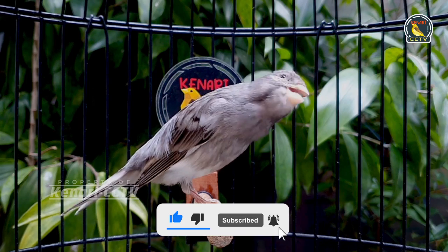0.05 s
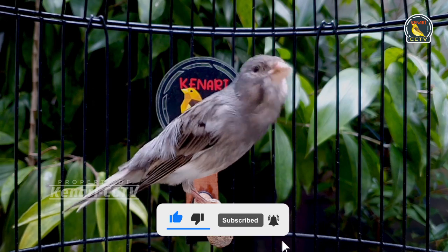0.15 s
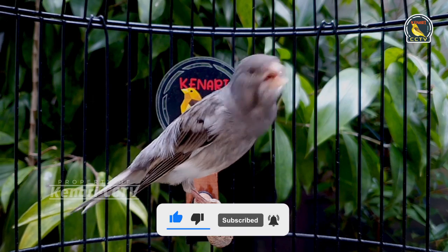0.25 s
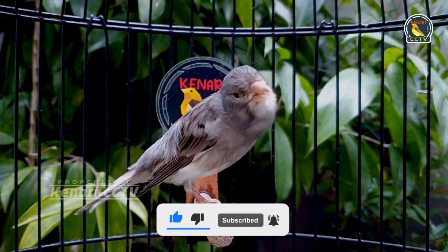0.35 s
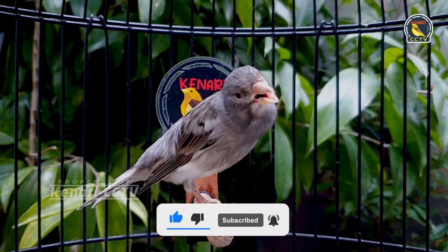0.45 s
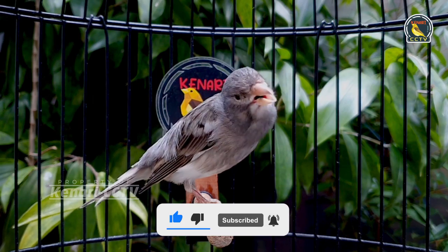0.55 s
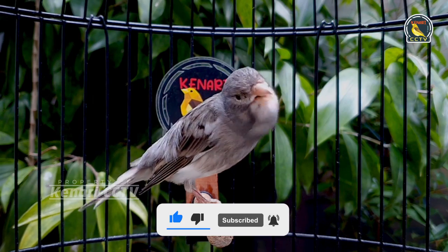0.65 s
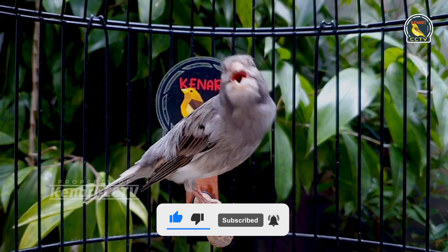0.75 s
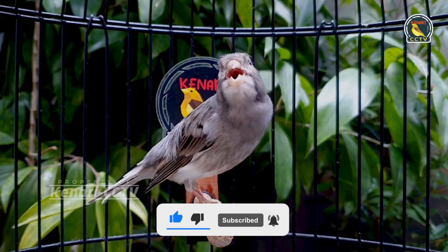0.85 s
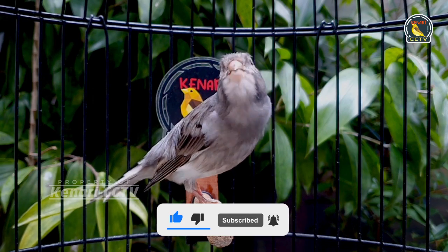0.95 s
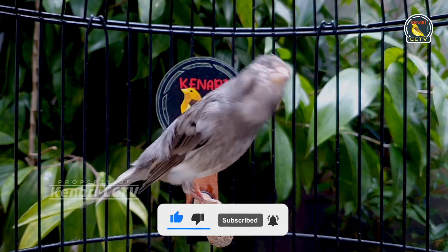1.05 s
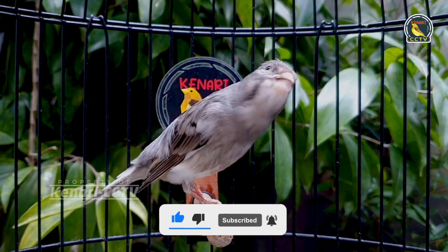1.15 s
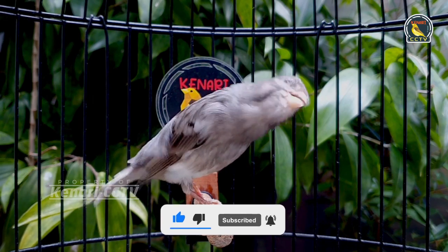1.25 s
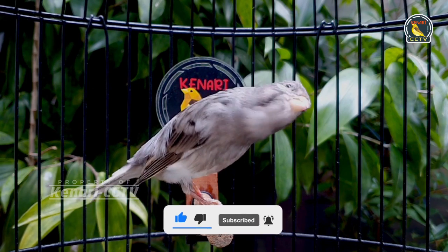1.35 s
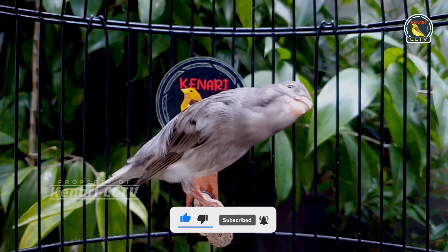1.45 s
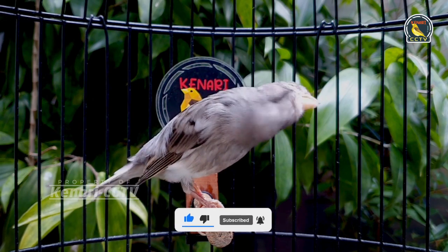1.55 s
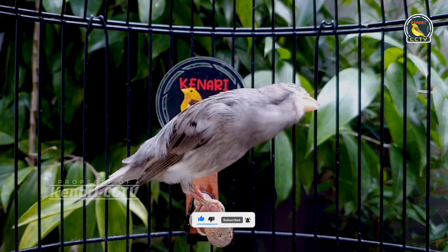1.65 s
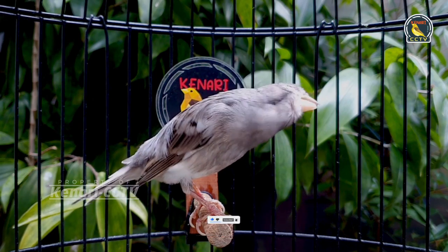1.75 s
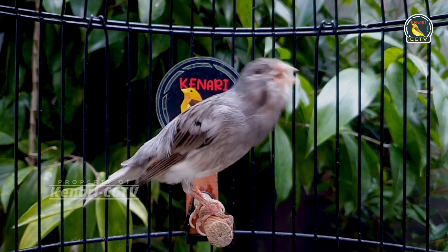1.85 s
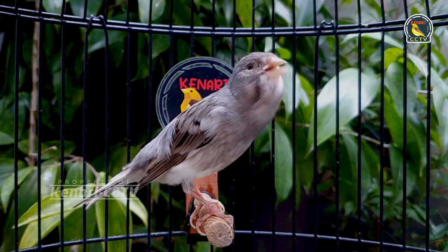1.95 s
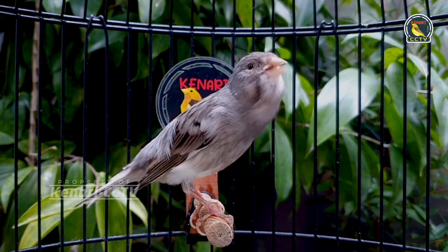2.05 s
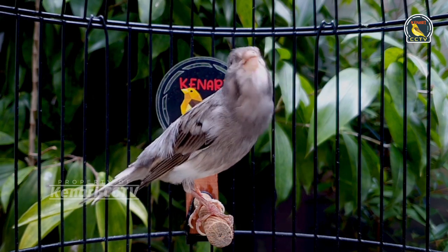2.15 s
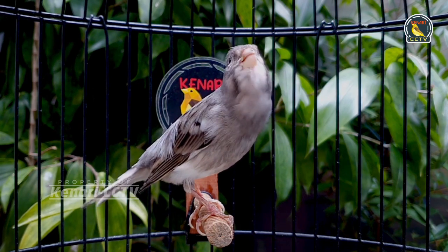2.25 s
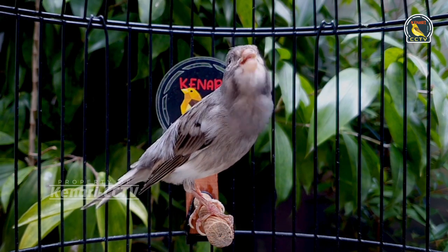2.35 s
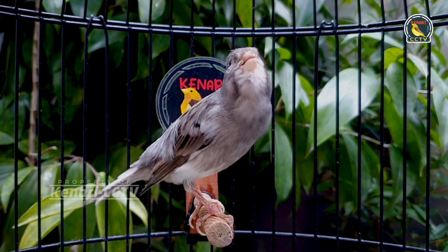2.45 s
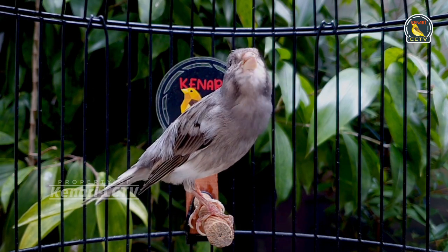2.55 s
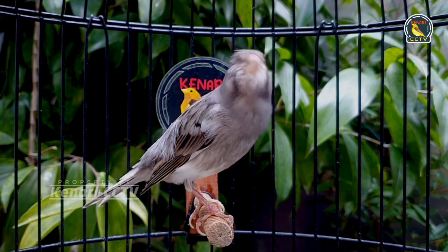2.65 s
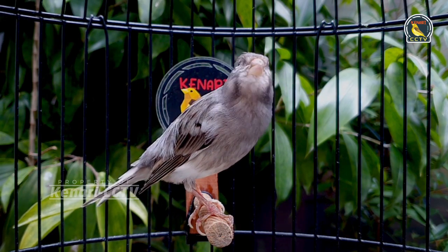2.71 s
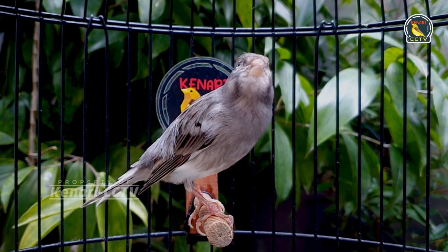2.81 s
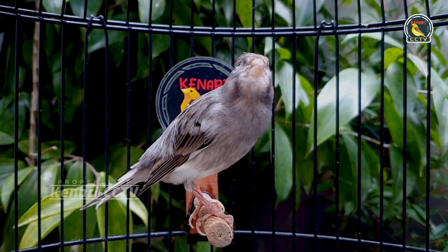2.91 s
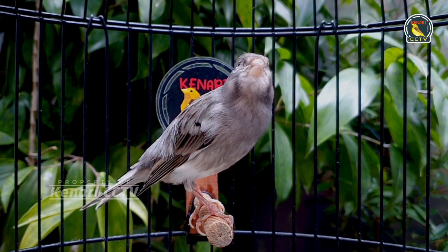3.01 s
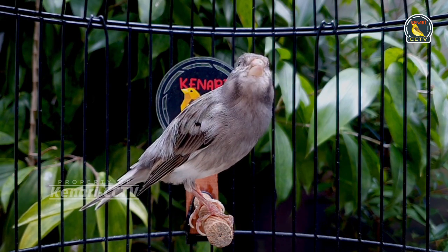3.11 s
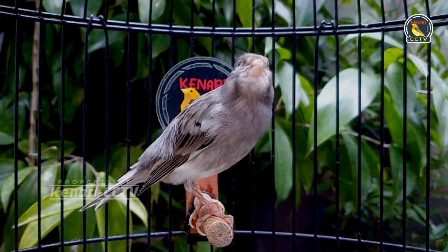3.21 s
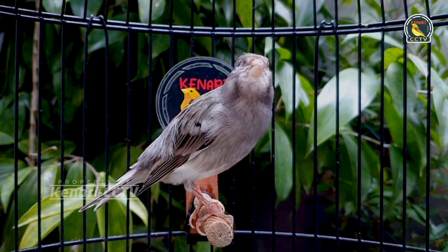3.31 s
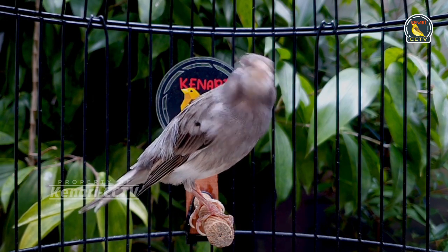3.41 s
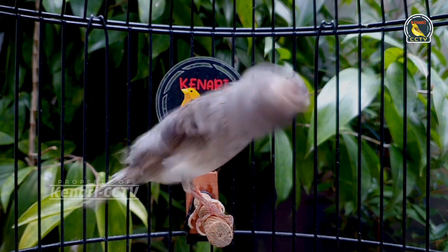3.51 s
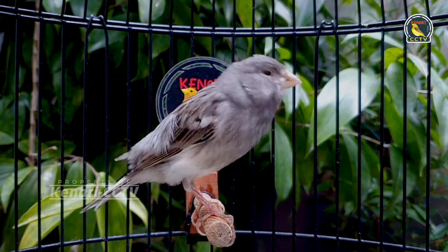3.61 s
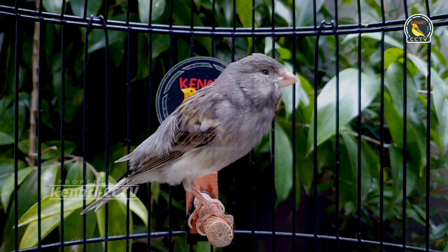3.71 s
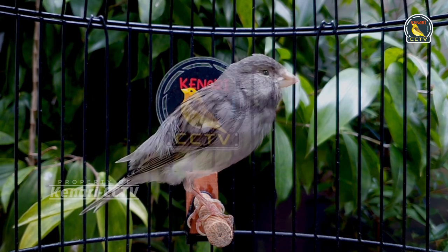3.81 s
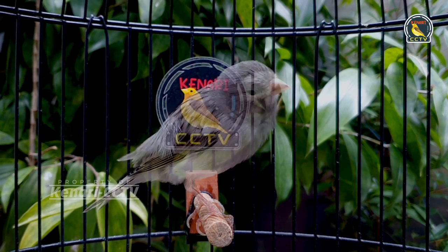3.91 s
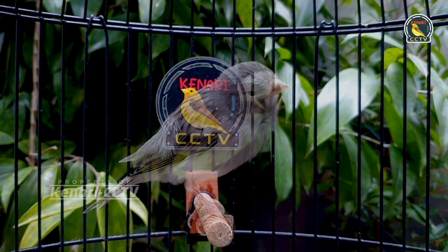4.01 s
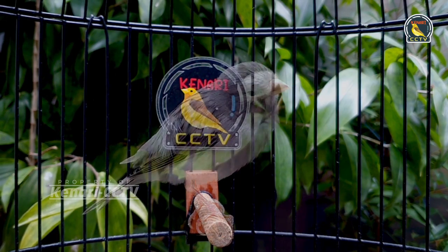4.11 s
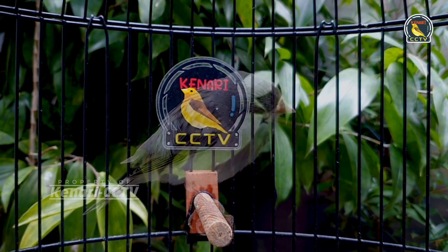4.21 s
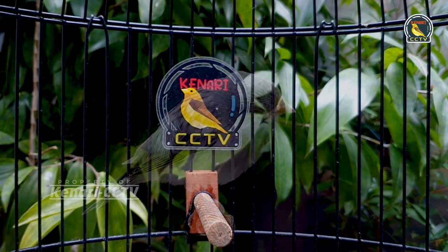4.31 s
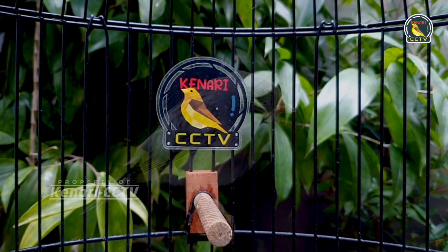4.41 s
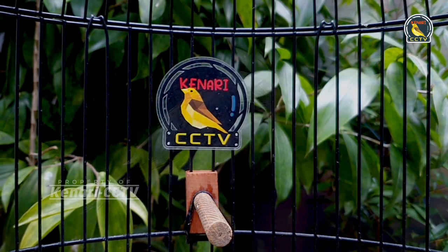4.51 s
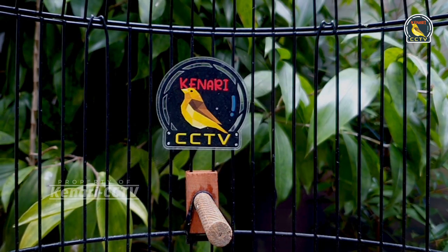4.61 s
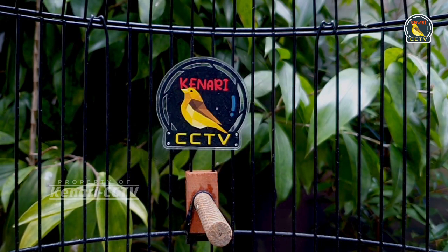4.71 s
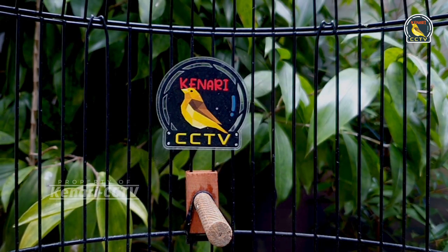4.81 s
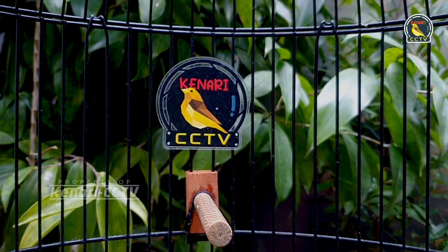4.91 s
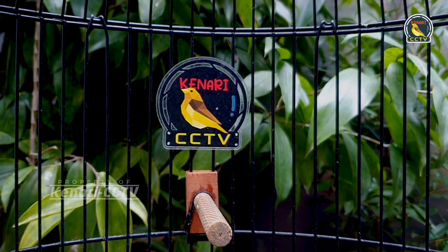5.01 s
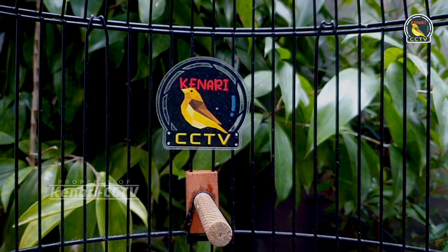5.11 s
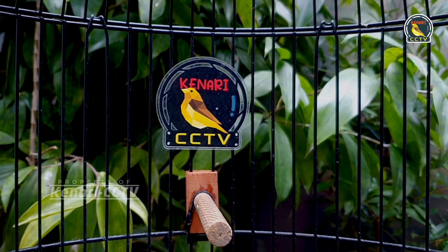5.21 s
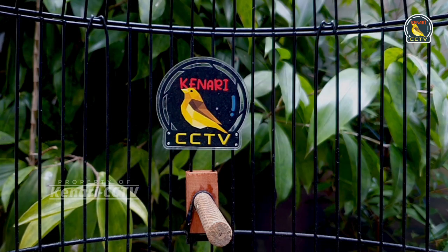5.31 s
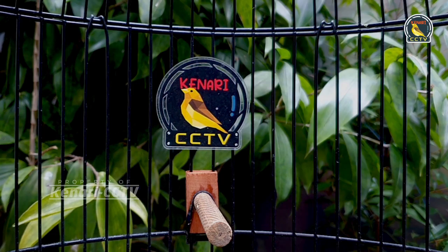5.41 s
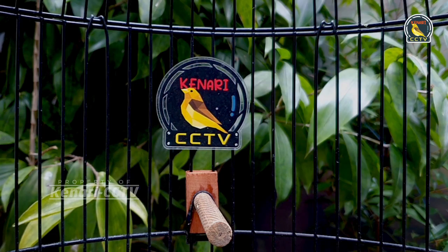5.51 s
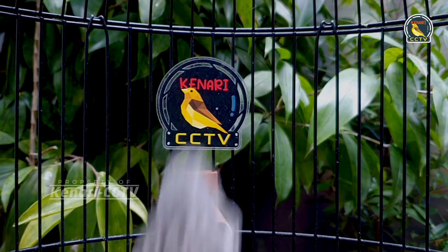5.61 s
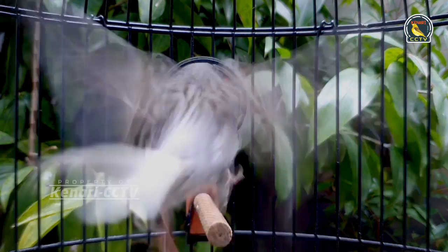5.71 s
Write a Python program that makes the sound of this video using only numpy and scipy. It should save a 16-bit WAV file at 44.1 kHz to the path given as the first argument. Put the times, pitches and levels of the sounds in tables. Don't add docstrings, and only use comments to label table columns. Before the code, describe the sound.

Close birdsong of sliding whistles and quick trills stops; wood creaks and knocks, then a rough chirp and fluttering wings end it.

```python
import sys
import numpy as np
from scipy import signal
from scipy.fft import rfft, irfft
from scipy.io import wavfile
from scipy.ndimage import uniform_filter1d

SR = 44100
rng = np.random.default_rng(int(sys.argv[2]) if len(sys.argv) > 2 else 0)


def dump(signal):
    limited = np.clip(np.atleast_2d(signal).T, -1, 1)
    pcm = np.round(limited * 32767).astype(np.int16)
    wavfile.write(sys.argv[1], SR, pcm)


def undo_db(level):
    steps = np.asarray(level, float) / 20
    return 10 ** steps


N = 254016
TIME = np.arange(N) / SR
RUN_IN = int(.2 * SR)


def rms_one(x):
    return x / np.sqrt(np.mean(x ** 2) + 1e-20)


def in_time(rows):
    s, *columns = np.transpose(rows)
    return [np.interp(TIME, s, c) for c in columns]


def pan(x, db):
    return x * undo_db(np.array([db / 2, -db / 2]))


def band_pass(x, order, low_hz, high_hz):
    return signal.sosfilt(signal.butter(order, [low_hz, high_hz], "band", fs=SR, output="sos"), x)


def resonate(x, peaks):
    out = 0
    for k, (hz, width, db) in enumerate(peaks):
        r = np.exp(-np.pi * width / SR)
        band = signal.lfilter([1, 0, -1], [1, -2 * r * np.cos(2 * np.pi * hz / SR), r * r], x)
        out = out + (-1) ** k * undo_db(db) * (1 - r * r) / 2 * band
    return out


def coloured(spectrum):
    hz, db = np.transpose(spectrum)
    log_hz = np.log(np.fft.rfftfreq(N, 1 / SR) + 1)
    shape = undo_db(np.interp(log_hz, np.log(hz), db, -120, -120))
    return rms_one(irfft(rfft(rng.standard_normal((2, N))) * shape, N))


def wobble(rate_hz):
    slow = signal.butter(2, rate_hz, fs=SR, output="sos")
    return rms_one(signal.sosfilt(slow, rng.standard_normal(N)))


def sing(out, s, hz, partial_dbs, pan_db, plain_count=1, flutter=None, first=1):
    # (frequency [Hz], level [dB])
    beak = [(2500, 11), (4000, -8), (5500, -6), (6800, -19.5), (7900, -4), (10500, 6), (13000, -6),
            (16000, -9)]
    left_lead_s = .00006
    i = np.arange(int(s[0] * SR), int(s[-1] * SR))
    t = i / SR
    pitch = uniform_filter1d(np.interp(t, s, hz), size=60)
    if flutter is not None:
        pitch = pitch * (1 + flutter[2, i])
    turns = np.cumsum(pitch) / SR + pitch * left_lead_s * np.array([[.5], [-.5]])
    to_edge = np.minimum(t - s[0], s[-1] - t)
    edge = np.sin(np.pi / 2 * np.clip(to_edge / .002, 0, 1)) ** 2
    for k, db in enumerate(partial_dbs, start=first):
        db = uniform_filter1d(np.interp(t, s, db), size=70)
        db = db + (k > plain_count) * np.interp(k * pitch, *np.transpose(beak))
        size = np.sqrt(2) * undo_db(db) * edge * np.clip((16500 - k * pitch) / 500, 0, 1)
        if flutter is not None:
            size = size * undo_db(flutter[k % 2, i] * (1.5 + (k > plain_count)))
        wave = np.sin(2 * np.pi * (k * turns + rng.random()))
        out[:, i + RUN_IN] += pan(size * wave, np.interp(t, s, pan_db))


def with_overtones(db, overtones_db, follow):
    chance_db = 2.5 * rng.standard_normal(len(overtones_db))
    return [db] + [follow * (db + 10.0) + over for over in overtones_db + chance_db]


def whistles():
    # (share of the length [0-1], pitch [Hz], level re the note [dB], left-right [dB])
    quick_fall = [(0, 6334, -32, -1), (.05, 7570, -11, 11), (.12, 7450, -19, 8.5), (.22, 6448, -17, -2),
                  (.33, 5750, 1.5, 0), (.5, 4765, -4, 1.5), (.7, 3810, 2.5, -3), (.86, 2945, -1.5, -0.5),
                  (.94, 2268, -10, -2.5), (1, 1247, -38.5, -1)]
    slow_fall = [(0, 7240, -43.5, -4), (.035, 7680, -16, 17.5), (.17, 7600, -16.5, 13.5),
                 (.4, 6596, -29, 1.5), (.7, 5724, -14.5, -1), (.865, 5110, -4.54, 2), (.925, 4886, -1.5, 4),
                 (.955, 4767, 1.5, -6.5), (1, 4446, -3, 10.5)]
    swelling_fall = [(0, 7300, -35.5, -1.5), (.035, 7680, -19.5, 21.5), (.16, 7620, -18.5, 20.5),
                     (.45, 6550, -21.5, 3), (.72, 5400, -1, 3), (.78, 5360, -17, 5.5),
                     (.86, 5150, -8.5, 2.5), (.94, 4763, -0.5, -1), (1, 4450, -16.5, 1)]
    flick = [(0, 4400, -23, -9), (.4, 3730, 2.5, -0.5), (1, 2390, -33.5, -5.5)]
    hook = [(0, 3900, -21, 0), (.3, 4700, -26.5, 1), (.5, 5580, -17, 3.5), (.62, 5820, -3, 2),
            (.77, 6330, -3.5, -6.5), (1, 6400, -9.5, 13)]
    pickup = [(0, 974, -21.5, 3), (.4, 1400, -11, -1), (.8, 1800, 3, 0), (1, 2052, -3, 0.5)]
    # (time [s], length [s], level [dB])
    quick_falls = [
        (-.114, .15, -13),
        (0.095, 0.15, -14.5),
        (0.295, .15, -16),
    ]
    slow_falls = [
        (0.486, .212, -15),
    ]
    swelling_falls = [
        (0.768, .214, -13),
    ]
    flicks = [
        (0.711, .0085, -12.5),
        (0.991, 0.006, -12),
    ]
    hooks = [
        (2.408, 0.045, -26.5),
    ]
    pickups = [
        (1.564, 0.0084, -39),
    ]
    # (time [s], pitch [Hz], level [dB], left-right [dB])
    held = [(2.449, 3164, -42, 5.5), (2.463, 3140, -24.5, 6), (2.477, 3120, -13.5, -8),
            (2.493, 3143, -18, -1), (2.504, 3095, -16.5, -4.5), (2.529, 3103, -19, -1),
            (2.56, 3092, -16.5, -1.5), (2.59, 3089, -28, 12.5), (2.616, 3024, -51, 2)]
    overtones_db = [-43, -39, -54.5, -55]
    held_overtones_db = [-45, -51.5, -62, -62.5]
    follow, soft_follow = .12, .9
    bar_echo_s, bar_echo_db = .00059, -11

    out = np.zeros((2, N + RUN_IN))
    waver = np.array([1.1 * wobble(rate_hz=60), 1.1 * wobble(rate_hz=80), .003 * wobble(rate_hz=44)])
    kinds = ((quick_fall, quick_falls, follow), (slow_fall, slow_falls, follow),
             (swelling_fall, swelling_falls, follow), (flick, flicks, follow),
             (hook, hooks, soft_follow), (pickup, pickups, soft_follow))
    for shape, notes, share_followed in kinds:
        share, hz, db, pan_db = np.transpose(shape)
        for s, length, note_db in notes:
            partials = with_overtones(db + note_db, overtones_db, share_followed)
            sing(out, s + share * length, hz, partials, pan_db, flutter=waver)
    out = out + undo_db(bar_echo_db) * np.roll(out, round(bar_echo_s * SR), axis=1)
    s, hz, db, pan_db = np.transpose(held)
    held_partials = with_overtones(db + 11, held_overtones_db, .9)
    sing(out, s, hz, held_partials[1:], pan_db, first=2)
    sing(out, s, hz, [db], pan_db, flutter=.5 * waver)
    return out


def rumble():
    # (time [s], thrum level [dB], housing ring re thrum [dB], left-right [dB])
    shaking = [(0, -55.5, -20.5, -11), (.72, -62.5, -17.5, -8), (1.12, -54.5, -20, -7),
               (1.65, -62.5, -15.5, -14), (2.15, -55, -20.5, -14.5), (2.65, -60, -16.5, -11),
               (2.95, -71, -12, -7.5), (3.55, -70, -17, -4.5), (3.65, -50, -18, -18),
               (3.88, -58.5, -10.5, -16), (4.03, -50, -5, -19), (4.45, -55, -5.5, -15.5),
               (4.58, -64, -3, -16), (5.1, -57, -9, -4.5), (5.47, -63, -3.5, -11.5), (5.56, -34.5, -9, -12),
               (5.64, -34, -12.5, -17), (5.76, -29, -14.5, -2)]
    # (frequency [Hz], width [Hz], level [dB])
    thrum_modes = [(50, 15, 3.5), (85.96, 39, 4), (127.3, 5.8, -7.5)]
    housing_modes = [(200, 37, -2.5), (273, 30.5, 4.5), (435, 60, -4.5), (557.5, 430, -16.5)]
    sway_db = 4
    thrum_db, ring_db, pan_db = in_time(shaking)
    thrum_pan = pan_db + sway_db * wobble(rate_hz=7.9)
    housing_pan = pan_db + sway_db * wobble(rate_hz=11.0)
    white = rng.standard_normal((2, 2, N))
    thrum = band_pass(resonate(white[0], thrum_modes), 2, 35, 145)
    housing = band_pass(resonate(white[1], housing_modes), 2, 150, 750)
    thrum = rms_one(thrum) * undo_db(thrum_db + 1.2 * wobble(rate_hz=16))
    housing = rms_one(housing) * undo_db(thrum_db + ring_db + 1.6 * wobble(rate_hz=50))
    return pan(thrum, thrum_pan) + pan(housing, housing_pan)


def hiss():
    # (frequency [Hz], level per Hz [dB])
    hiss_colour = [(410, -30.5), (700, -12.5), (1060, -17.5), (1180, -18.5), (3030, -20), (5020, -20),
                   (6420, -26.5), (11200, -23.5), (15500, -48.5)]
    shaken = np.clip((TIME - 3.55) / 0.14, 0, 1)
    return undo_db(-84 + 4 * shaken) * coloured(hiss_colour)


def trill(notes, lead, body, lead_db, lead_follow, wait_s, overtones_db, follow, pan_db):
    out, lead, body = np.zeros((2, N + RUN_IN)), np.array(lead), np.array(body)
    for s, end, top_hz, loud_db, falter_db in notes:
        soft_db = lead_db + lead_follow * (loud_db + 15.5)
        times = s + np.r_[lead[:, 0], wait_s + body[:, 0] * (end - wait_s)]
        climb_hz = lead[-1, 1] + body[:, 1] * (top_hz - lead[-1, 1])
        hz = np.r_[lead[:, 1], climb_hz]
        db = np.r_[soft_db + lead[:, 2], loud_db + body[:, 2] + falter_db * body[:, 3]]
        sing(out, times, hz, with_overtones(db, overtones_db, follow), pan_db + 0 * times)
    return out


def slow_trill():
    # (time at 3 kHz [s], time from there to the end [s], top pitch [Hz], loud level [dB],
    # mid-note falter [dB])
    slow_notes = [(1.061, 0.017, 4160, -12, -4.5), (1.135, 0.023, 4146, -9.5, -3.5),
                  (1.21, 0.029, 4315, -10, -9), (1.283, 0.025, 4210, -11, 6),
                  (1.364, 0.019, 4308, -6.5, -7), (1.44, 0.025, 4416, -8.5, -10.5),
                  (1.513, 0.016, 4210, -5.5, -11.5)]
    # (time re 3 kHz [s], pitch [Hz], level re lead-in [dB])
    slow_lead = [(-.023, 992, -25), (-.0195, 1438, -8.5), (-.012, 1665, -2), (-.006, 2150, 1),
                 (-.001, 2877, -2.5)]
    # (share of length [0-1], share of climb [0-1], level re loud [dB], share of falter [0-1])
    slow_body = [(0, .6, -19.5, 0), (.2, .76, -5.5, 0), (0.422, .88, 1.5, 0), (0.579, .95, -0.5, 1),
                 (0.759, 1.01, 2.5, .25), (.95, 1.08, -10.5, .2), (1.3, 1.36, -42, 0)]
    slow_overtones_db = [-34.5, -44, -67.5, -70]
    return trill(slow_notes, slow_lead, slow_body, lead_db=-34.5, lead_follow=0, wait_s=0.0038,
                 overtones_db=slow_overtones_db, follow=.8, pan_db=1.05)


def fast_trill():
    # (time at 3 kHz [s], time from there to the end [s], top pitch [Hz], loud level [dB],
    # mid-note falter [dB])
    fast_notes = [(1.576, 0.0155, 4081, -12.5, -0.4), (1.624, 0.0125, 4170, -8.5, -7),
                  (1.669, 0.013, 4114, -11.5, -1), (1.716, 0.0135, 4184, -10, -0.3),
                  (1.763, 0.013, 4142, -12.5, 1), (1.808, 0.013, 4055, -13, 0.5),
                  (1.854, 0.013, 4123, -12.5, -1), (1.9, 0.012, 4027, -10.5, 0.4),
                  (1.948, 0.012, 3977, -13.5, -5.5), (1.993, 0.01274, 4142, -11.5, -1.9),
                  (2.041, 0.014, 3940, -11.5, -3), (2.087, 0.01207, 4051, -13, -4.5),
                  (2.135, 0.01, 4153, -10.5, -1.5), (2.184, 0.013, 4038, -11.5, -5),
                  (2.231, 0.011, 4163, -12, -5.5), (2.28, 0.0133, 4205, -15, 2),
                  (2.331, 0.011, 4134, -13, -4.6), (2.393, 0.0069, 3700, -29.5, -0.5)]
    # (time re 3 kHz [s], pitch [Hz], level re lead-in [dB])
    fast_lead = [(-.0105, 1700, -27), (-.0075, 1950, -11.5), (-.005, 2393, 5.5), (-.002, 2750, 8),
                 (0, 3006, 16)]
    # (share of length [0-1], share of climb [0-1], level re loud [dB], share of falter [0-1])
    fast_body = [(.15, .24, -4.5, .4), (.4, 0.73, 3, 0), (.58, 0.88, 0.8, 0.75), (.78, 1.06, 5, 0),
                 (.98, 1, -1, 0.049), (1.248, 0.7, -14.5, 0), (1.599, 1.43, -30.5, 0.42)]
    fast_overtones_db = [-38.5, -43, -44.5, -49]
    return trill(fast_notes, fast_lead, fast_body, lead_db=-32.5, lead_follow=0.38, wait_s=0,
                 overtones_db=fast_overtones_db, follow=.4, pan_db=0)


def hums():
    # (start [s], end [s], frequency [Hz], level [dB])
    hum_times = [
        (2.754, 3.466, 435, -90.5),
        (5.023, 5.461, 200, -62.5),
    ]
    out = np.zeros(N)
    for start, end, hz, db in hum_times:
        fade = np.clip(np.minimum(TIME - start, end - TIME) / 0.024, 0, 1)
        out += undo_db(db) * fade * rms_one(resonate(rng.standard_normal(N), [(hz, 14, 0)]))
    return out


def contact(s):
    t = np.clip(TIME - s, 0, None)
    return (t > 0) * (np.exp(-t / .002) + .2 * np.exp(-t / .025))


def perch_creak():
    # (time [s], level [dB])
    creak = [(3.917, -73), (3.935, -60), (3.955, -52.5), (3.985, -59.5), (4.005, -74), (4.04, -71.5),
             (4.16, -105)]
    # (frequency [Hz], width [Hz], level [dB])
    creak_modes = [(737.4, 19, 7), (1409, 54, 1), (2470, 220, -10), (3700, 65, -4), (5315, 1100, -18),
                   (6540, 400, -43), (9470, 2700, -23.5)]
    # (time [s], level [dB])
    knocks = [
        (3.9183, -62),
        (3.9492, -57),
    ]
    slips = rng.standard_normal(N) * undo_db(3.5 * wobble(rate_hz=70))
    sounding = (TIME > creak[0][0]) & (TIME < creak[-1][0])
    out = rms_one(resonate(slips, creak_modes)) * undo_db(in_time(creak)[0]) * sounding
    catches = sum(undo_db(db) * contact(s) for s, db in knocks)
    return out + resonate(rng.standard_normal(N) * catches + 1e-18, creak_modes)


def perch_taps():
    # (time [s], level [dB], extra level of the low wood modes [dB])
    taps = [
        (4.1683, -41, 1.5),
        (4.3234, -49, 5.5),
    ]
    # (frequency [Hz], width [Hz], level [dB])
    tap_modes = [(444, 82, -0.5), (730, 71, 1), (940, 16, 13), (1330, 60, -1.5), (1990, 74, -5.5),
                 (2620, 117, -8), (3540, 140, 5), (4140, 180, 0.5), (4700, 150, 0.5), (5150, 144, -1),
                 (5750, 260, -9)]
    noise = rng.standard_normal(N)
    low_hits = sum(undo_db(db + low_db) * contact(s) for s, db, low_db in taps)
    high_hits = sum(undo_db(db) * contact(s) for s, db, low_db in taps)
    low = undo_db(2.0) * resonate(noise * low_hits + 1e-18, tap_modes[:4])
    high = undo_db(5.0) * resonate(noise * high_hits + 1e-18, tap_modes[4:])
    return low + high


def call():
    # (time [s], pitch [Hz], effort [dB])
    voice = [(5.0, 1266, -57), (5.014, 1386, -30), (5.031, 1529, -31.5), (5.044, 1621, -26),
             (5.073, 1780, -26), (5.1, 1780, -24.5), (5.122, 1900, -30), (5.134, 1968, -21),
             (5.157, 2018, -20.5), (5.203, 2111, -18), (5.212, 2116, -25), (5.221, 2144, -21.5),
             (5.24, 2187, -18), (5.258, 2283, -28), (5.273, 2365, -29), (5.306, 2386, -29),
             (5.334, 2512, -23.5), (5.37, 2600, -24.5)]
    # (frequency [Hz], level [dB])
    mouth = [(1300, -1), (1900, -29), (2600, -10.5), (3300, -7), (4450, 4), (5400, -9), (7500, -35),
             (10500, -20)]
    # (frequency [Hz], width [Hz], level [dB])
    throat = [(3410, 950, 0.5), (4210, 1450, -3), (5350, 2700, -5.5), (9830, 5200, -22), (12900, 3700, -35)]
    hold_s, release_s = 0.04, 0.022
    air_attack_s, air_release_s = .016, .035

    out = np.zeros((2, N + RUN_IN))
    hold_end = voice[-1][0] + hold_s
    s = np.arange(voice[0][0], hold_end + release_s, .005)
    at = (s * SR).astype(int)
    hz, effort_db = (curve[at] for curve in in_time(voice))
    effort_db = effort_db - 22 * np.clip((s - voice[-1][0] - hold_s) / release_s, 0, 1)
    low_dbs = [effort_db + np.interp(k * hz, *np.transpose(mouth)) for k in range(1, 5)]
    upper = [-52 - 3 * k + np.minimum(effort_db + 41.5, 0) for k in range(7)]
    flutter = np.array([.7 * wobble(rate_hz=90), 2.2 * wobble(rate_hz=100), .009 * wobble(rate_hz=55)])
    pan_db = -2 + 2.5 * wobble(rate_hz=33)[at]
    sing(out, s, hz, low_dbs + upper, pan_db, plain_count=4, flutter=flutter)

    air = resonate(resonate(rng.standard_normal(N), throat), [(4350, 9600, 0)])
    air = band_pass(air, 6, 2600, 5900)
    edges = np.minimum((TIME - s[0]) / air_attack_s, (s[-1] - TIME) / air_release_s)
    edges = np.clip(edges, 0, 1) ** 3
    air_db = -41 - 45 * np.clip(TIME - s[0], 0, 1)
    rasp = band_pass(rng.standard_normal(N), 6, 8600, 15500)
    puff = band_pass(rng.standard_normal(N), 4, 1200, 6000)
    out[:, RUN_IN:] += rms_one(rasp) * undo_db(-62 + 4.9 * wobble(rate_hz=54)) * edges
    out[:, RUN_IN:] += rms_one(puff) * undo_db(-66) * (TIME > 4.982) * (TIME < s[1])
    out[:, RUN_IN:] += rms_one(air) * undo_db(air_db + 3.5 * wobble(rate_hz=30)) * edges
    return out


def wings():
    # (time [s], push on the left port [dB], feather swish [dB], swish length [s])
    beats = [
        (5.49, -73, -60, 0.059),
        (5.525, -43, -47, 0.019),
        (5.551, -33, -44, 0.058),
        (5.602, -18.5, -44.5, 0.032),
        (5.631, -28, -57, 0.13),
        (5.742, -30.5, -48, 0.013),
    ]
    # (frequency [Hz], level per Hz [dB])
    feather_colour = [(290, -29), (500, 7), (1750, -4), (2540, -6), (2720, -10.5), (4070, -10), (7240, -24),
                      (15500, -16)]
    out = np.zeros((2, N))
    swish = coloured(feather_colour) * undo_db(3.5 * wobble(rate_hz=45) - 1.2)
    dull = signal.sosfilt(signal.butter(4, 6500, fs=SR, output="sos"), swish)
    bright = signal.sosfilt(signal.butter(4, 6500, "high", fs=SR, output="sos"), swish)
    for s, push_db, swish_db, length in beats:
        t = np.clip(TIME - s, 0, None)
        turns = 50 * t + .5 * (1 - np.exp(-t / 0.0045))
        out[0] -= undo_db(push_db) * np.sin(2 * np.pi * turns) * np.exp(-t / 0.058)
        slow, quick = t / (0.5 * length), t / (0.38 * length)
        swell = dull * slow * np.exp(-slow) + 1.42 * bright * quick * np.exp(-quick)
        out += undo_db(swish_db + 5.0) * swell
    return out


def breath(song):
    # (time [s], level [dB])
    breath_curve = [(.9, -11), (1.5, -12), (1.6, -3), (2.4, 3), (2.46, -2), (2.6, -9.5)]
    # (frequency [Hz], level per Hz [dB])
    air_colour = [(500, -29.5), (1300, -14), (4500, -3.5), (5600, -9), (7000, -20.5), (8500, -2),
                  (11500, -10.5), (15500, -12)]
    effort = uniform_filter1d(abs(song), size=400)
    effort = effort * undo_db(in_time(breath_curve)[0] + 3 * wobble(rate_hz=14))
    return undo_db(-36) * effort * coloured(air_colour)


def room(x, wet_db, send_db=0, echo_db=0):
    # (delay [s], level [dB])
    port_echoes = [
        [(.00177, -8), (.0035, -18), (.007, -22.5)],
        [(.00174, -8), (.0027, -21), (.0062, -20)],
    ]
    # (band top [Hz], level [dB])
    tail_bands = [(700, 15.5), (2000, 0.5), (3500, 5.5), (5000, 6), (7500, 5), (16000, 0)]
    tail_t60_s = [.55, .48, .45, .47, .38, .27]
    head_turns_per_s = 4
    t = np.arange(int(.8 * SR)) / SR
    tails, near, low_hz = np.zeros((2, 2, len(t))), np.zeros((2, len(t))), 100
    white = rng.standard_normal(tails.shape) * np.clip((t - .003) / 0.00091, 0, 1)
    for (top_hz, db), t60 in zip(tail_bands, tail_t60_s):
        fall = undo_db(db + wet_db - 60 * t / t60) * np.sqrt(2 * np.log(1000) / t60 / SR)
        tails += band_pass(white, 2, low_hz, top_hz) * fall
        low_hz = top_hz
    for port, echoes in enumerate(port_echoes):
        for delay, db in echoes:
            near[port] += undo_db(db) * np.sinc((t - delay) * SR) * (abs(t - delay) < .0005)
    turn = 2 * np.pi * head_turns_per_s * np.arange(x.shape[1]) / SR
    sent = x * undo_db(send_db)
    paths = ((x * undo_db(echo_db), near), (sent * np.cos(turn), tails[0]), (sent * np.sin(turn), tails[1]))
    return x + sum(signal.fftconvolve(fed, path, axes=1)[:, :x.shape[1]] for fed, path in paths)


def canary():
    # (time [s], level [dB])
    facing = [(2.44, 0), (2.46, -9), (4.9, -9), (5.1, -5), (5.14, -13), (5.27, -13), (5.31, -3)]
    song = whistles() + slow_trill() + fast_trill() + call()
    song[:, RUN_IN:] += breath(song[:, RUN_IN:])
    send_db = np.r_[np.zeros(RUN_IN), in_time(facing)[0]]
    echo_db = np.r_[np.zeros(RUN_IN), -10 * (TIME > 4.0)]
    return room(song, wet_db=-8.5, send_db=send_db, echo_db=echo_db)[:, RUN_IN:]


def scene():
    perch = perch_creak() + perch_taps()
    wood = undo_db(-2.5) * room(perch[None], wet_db=2.5)
    return canary() + wood + wings() + rumble() + hums() + hiss()


def roll_off(x):
    return signal.sosfilt(signal.butter(12, 15830, fs=SR, output="sos"), x)


def record(dry):
    rounded = 1.7 * np.tanh(dry / 1.7) * np.clip(TIME / .0006, 0, 1)
    treble_cut = signal.ellip(10, .5, 70, 15800, fs=SR, output="sos")
    mix = signal.sosfilt(treble_cut, rounded)
    return roll_off(mix)


dry = scene()
out = record(dry)
dump(out)
```